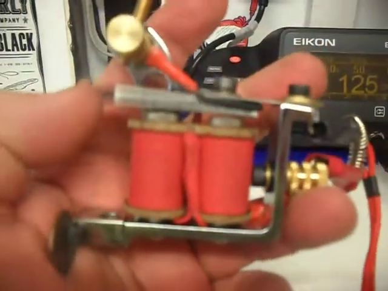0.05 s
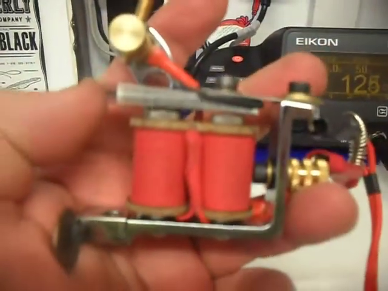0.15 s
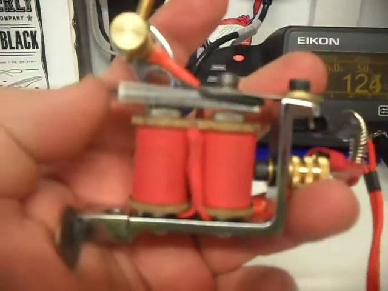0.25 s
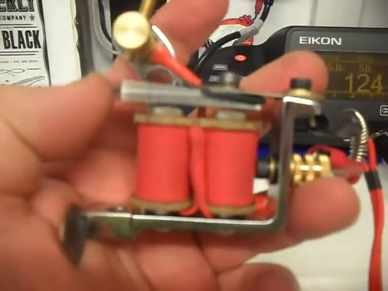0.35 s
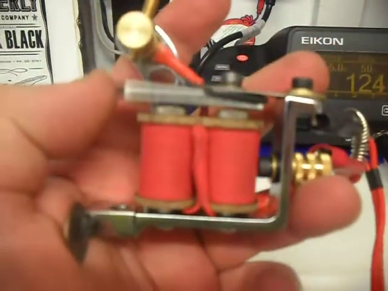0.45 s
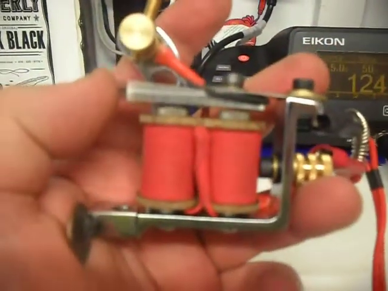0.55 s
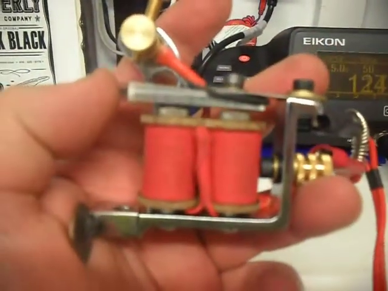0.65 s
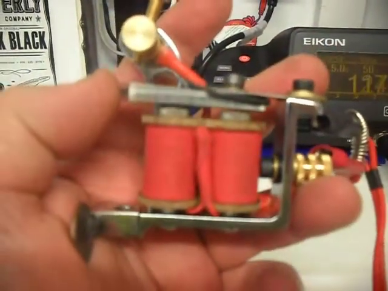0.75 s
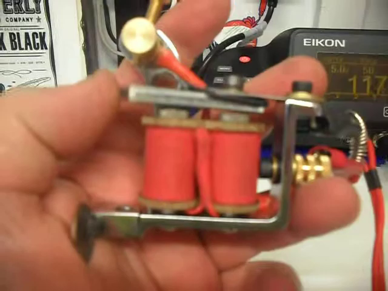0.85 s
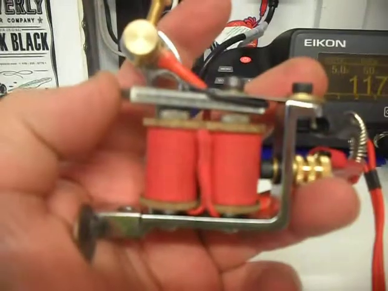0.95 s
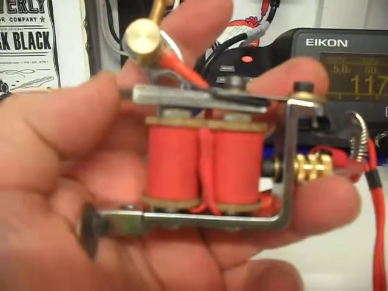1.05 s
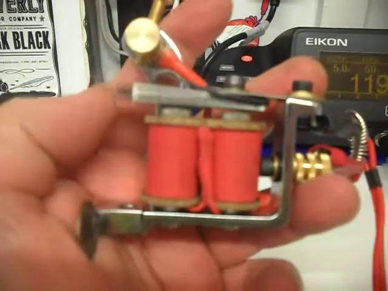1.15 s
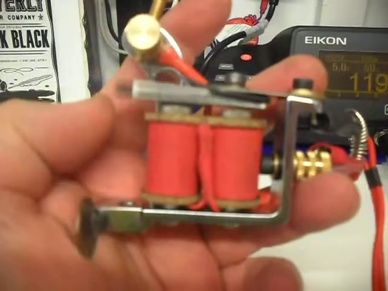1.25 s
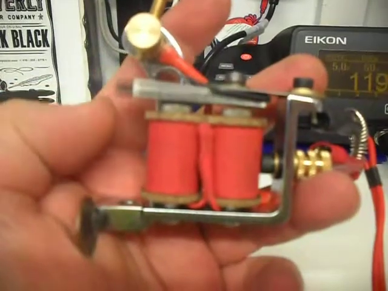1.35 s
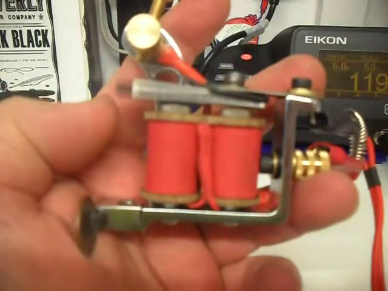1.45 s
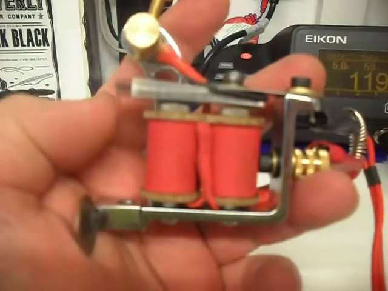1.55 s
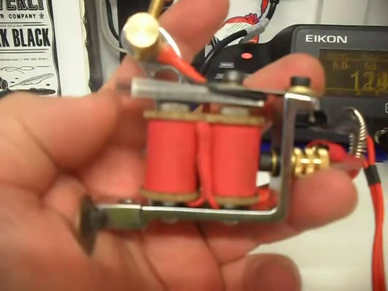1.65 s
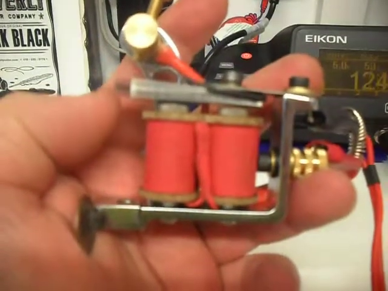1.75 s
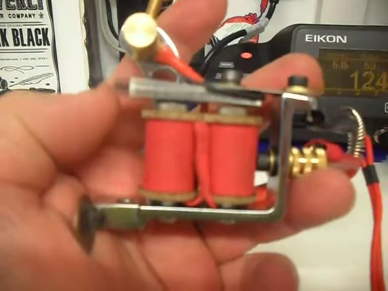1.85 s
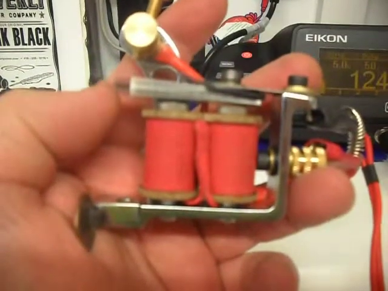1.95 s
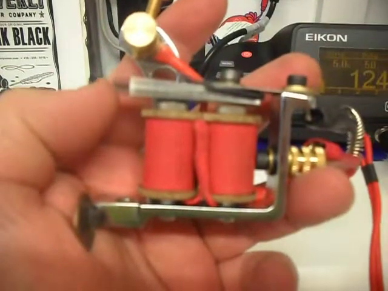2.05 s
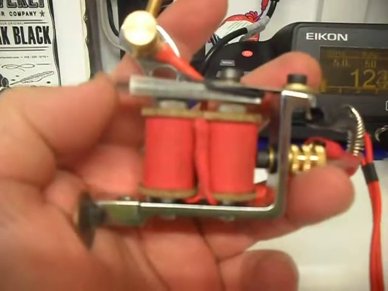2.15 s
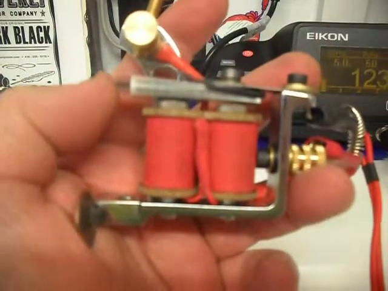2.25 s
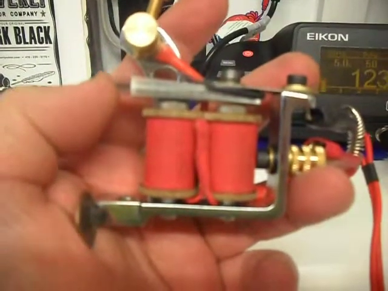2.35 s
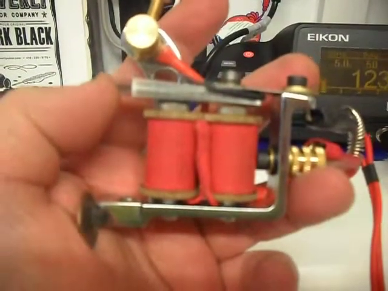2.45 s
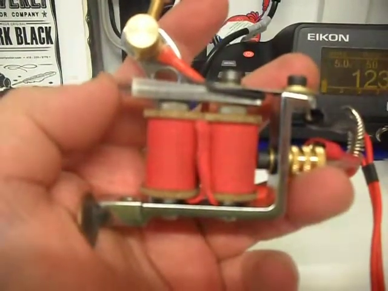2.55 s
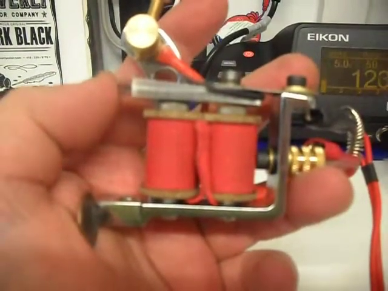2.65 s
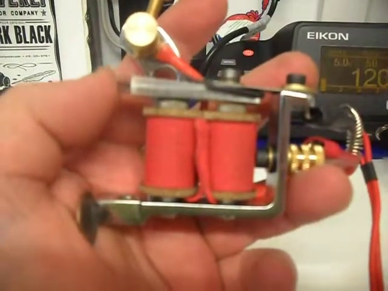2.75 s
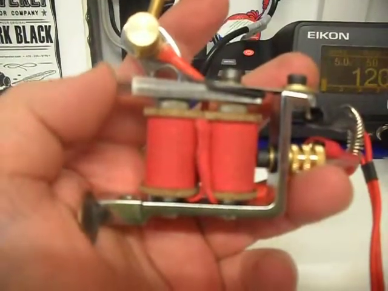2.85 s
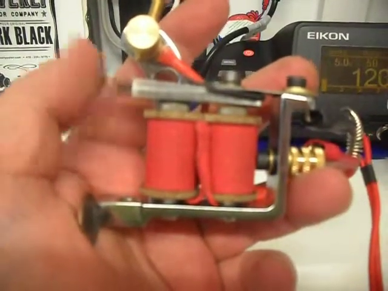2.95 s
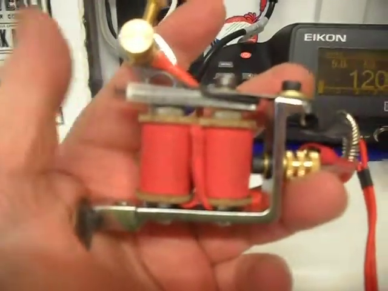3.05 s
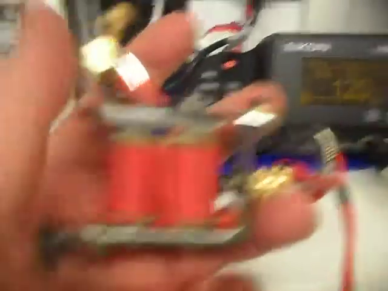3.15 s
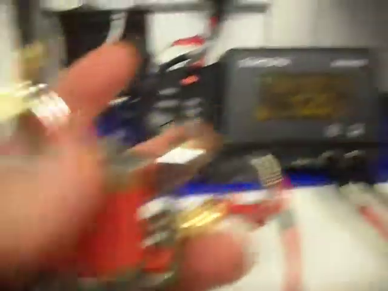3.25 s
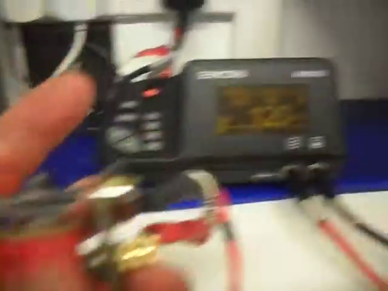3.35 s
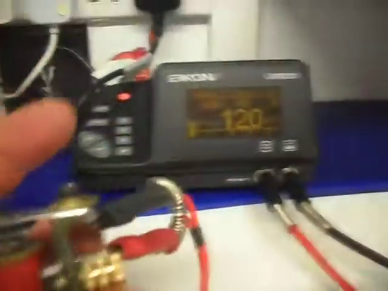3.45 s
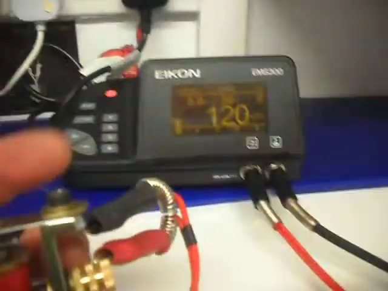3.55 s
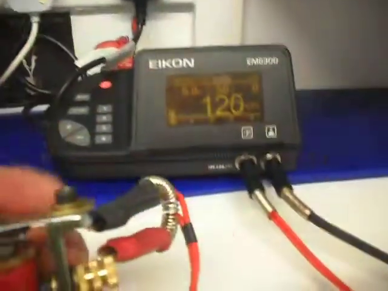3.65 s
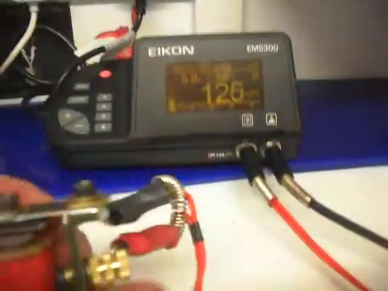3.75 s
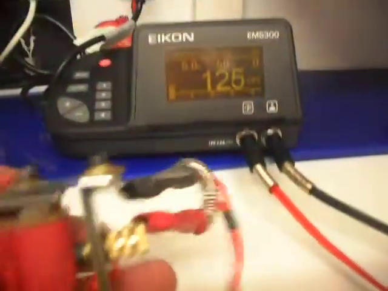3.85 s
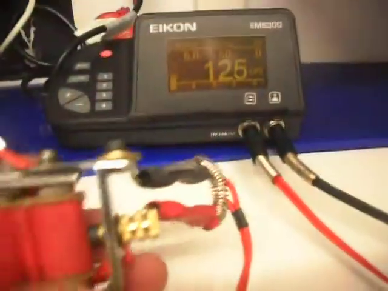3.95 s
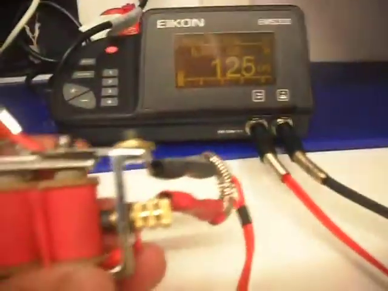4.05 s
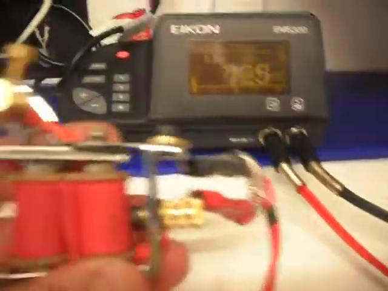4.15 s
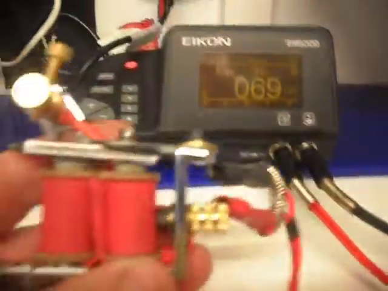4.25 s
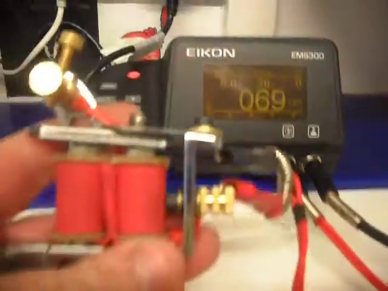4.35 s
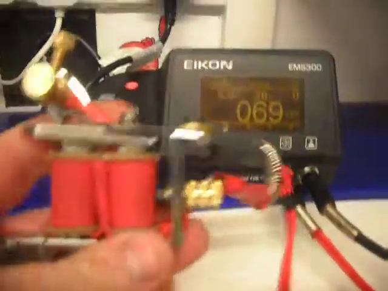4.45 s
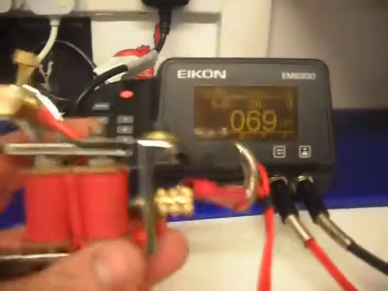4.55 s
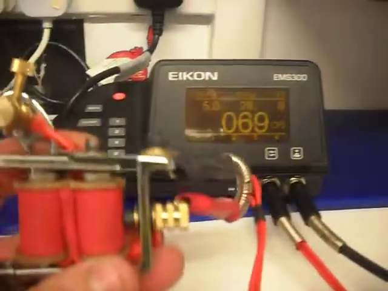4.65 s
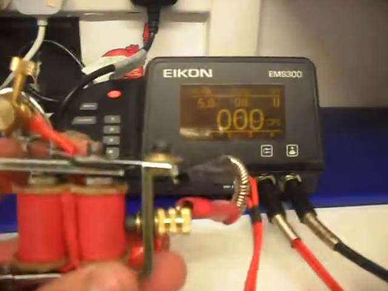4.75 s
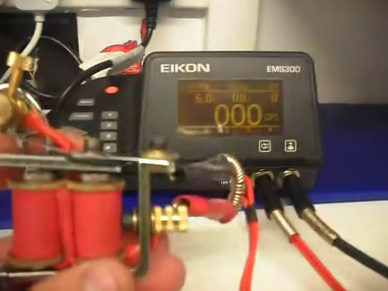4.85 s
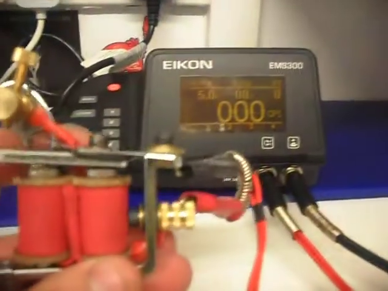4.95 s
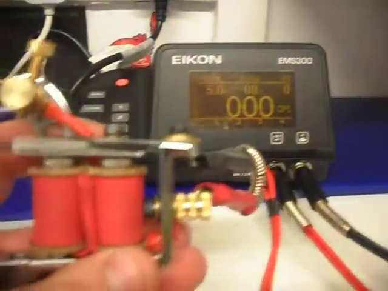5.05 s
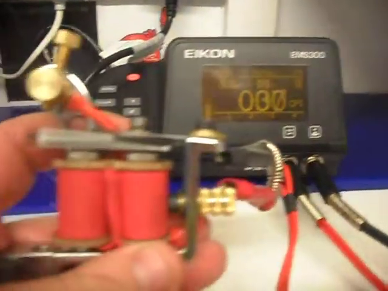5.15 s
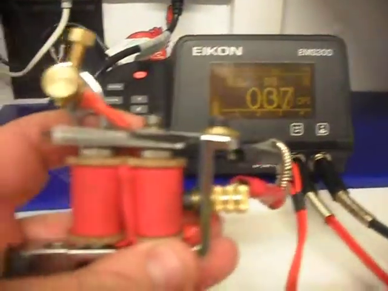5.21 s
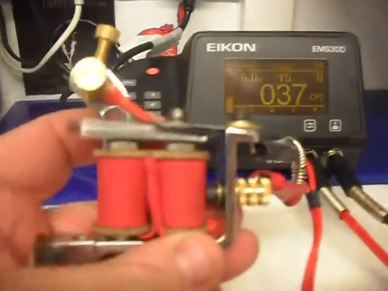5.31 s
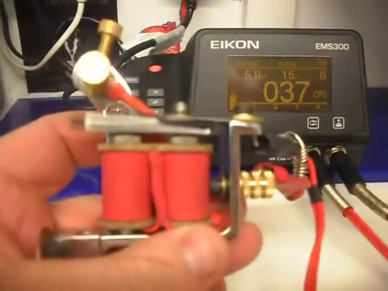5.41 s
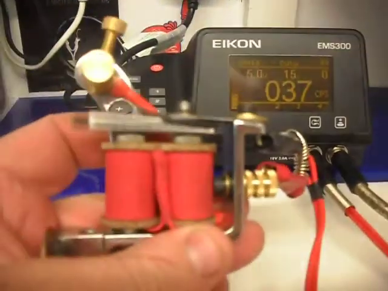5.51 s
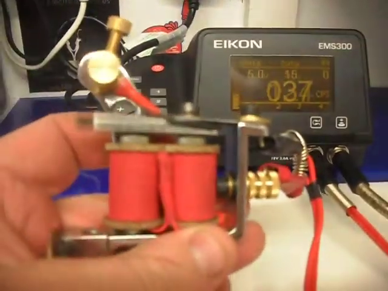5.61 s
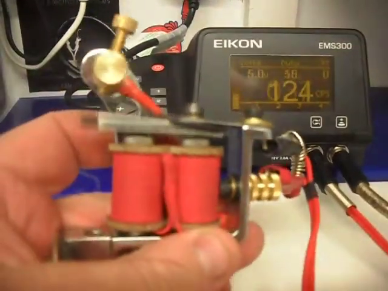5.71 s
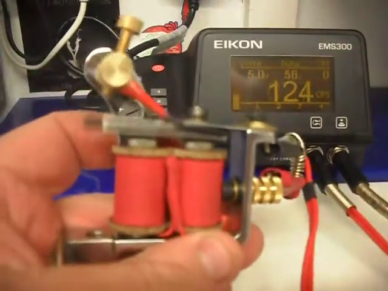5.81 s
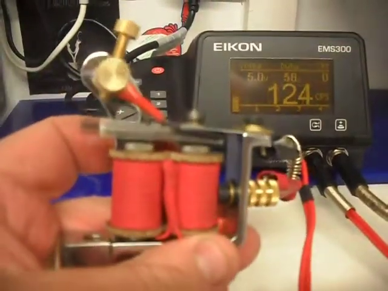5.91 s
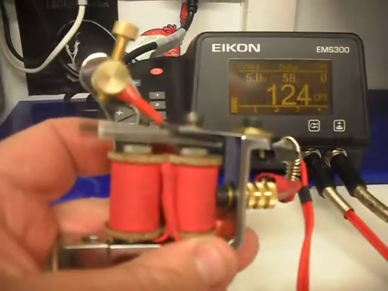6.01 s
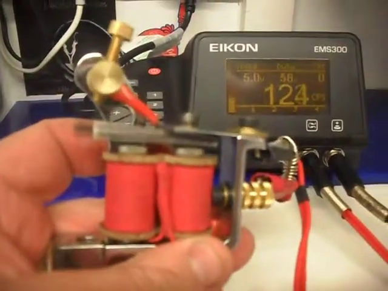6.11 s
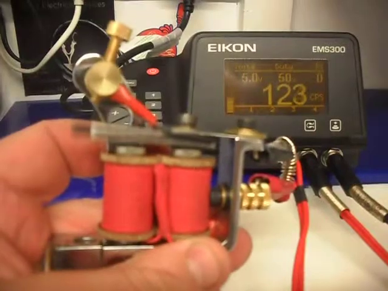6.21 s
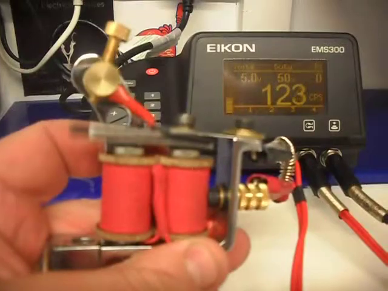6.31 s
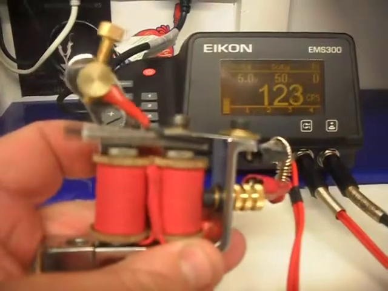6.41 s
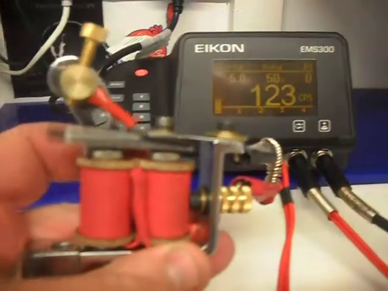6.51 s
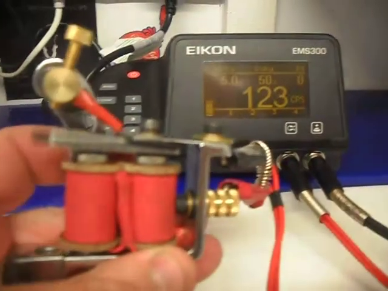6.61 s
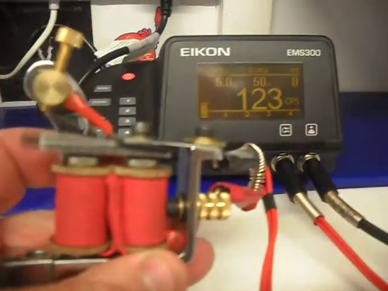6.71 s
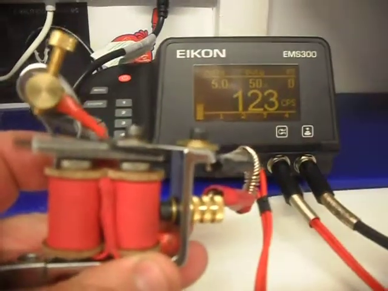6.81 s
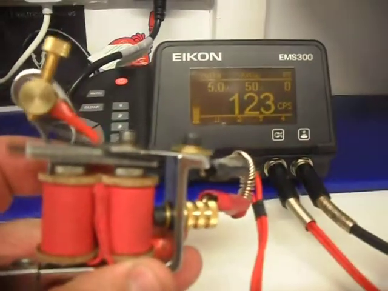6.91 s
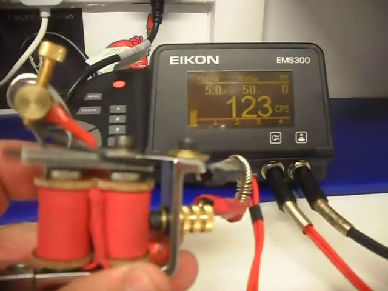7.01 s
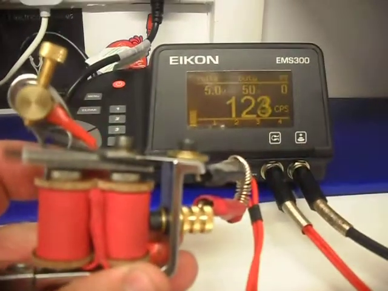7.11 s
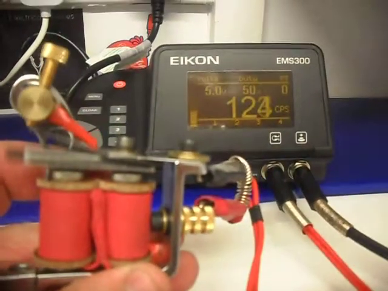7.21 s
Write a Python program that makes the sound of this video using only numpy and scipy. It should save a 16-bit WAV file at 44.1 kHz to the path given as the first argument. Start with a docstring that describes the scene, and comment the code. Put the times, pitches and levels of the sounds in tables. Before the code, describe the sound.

A small coil tattoo machine runs in a hand close to the microphone in a small room with a short tail, faint hiss, low rumble and slight mains hum. It starts mid-buzz, a hard metallic rasp near 120 strokes per second, weakening and sagging slightly in pitch until 0.5 s. Faint, dry ticking with a few grazing swells follows until 1.1 s, when the full bright buzz snaps back. It softens around 2 s, wavers and fades near 2.7 s into a very brief stutter, then recovers by 2.9 s. Dull handling thumps join at 3.2-3.3 s as the treble swirls with movement. Power cuts at about 3.87 s with a quickly dying chatter. Low, soft knocks come near 3.9, 4.2, 4.5, 4.75 and 4.95 s. At 5 s the buzz restarts abruptly, crisp with sizzling ticks, and stays nearly steady around 124 strokes per second, easing slightly until it ends at 7.3 s.

```python
"""A small room, a desk below, and a coil tattoo machine buzzing in a hand close to the microphone.
About 120 times a second the armature strikes the coil core and rings the steel frame, then the spring
ticks back on its screw. Twice the stroke falls short, leaving faint spring ticks and grazing blows.
Later the power is cut for a second while the grip is changed, with dull knocks of hand and cord.
Nearby surfaces swirl the treble, over a short room tail, low rumble, hiss and mains hum."""
import sys
import numpy as np
from scipy import signal
from scipy.fft import rfft, irfft, next_fast_len
from scipy.io import wavfile
from scipy.ndimage import uniform_filter1d

SR = 44100
rng = np.random.default_rng(int(sys.argv[2]) if len(sys.argv) > 2 else 0)


def master(y):
    """Save y as 16-bit WAV."""
    cut = np.clip(np.atleast_2d(y).T, -1, 1)
    pcm = np.round(cut * 32767)  # scale
    wavfile.write(sys.argv[1], SR, pcm.astype(np.int16))


N = 320607
T = np.arange(N) / SR  # seconds
CLICK_SIZE = 2048  # samples in one click
HZ = np.fft.rfftfreq(CLICK_SIZE, 1 / SR)
EDGE_HZ = 12500  # upper limit of the clicks and of the microphone
SOUND_SPEED = 343  # m/s

# Background noise. Each row: frequency in Hz, relative spectrum level in dB.
FLOOR_SPECTRUM = [(15, -9.5), (30, 0.5), (50, -9.5), (105, -21), (170, -22), (330, -23.5), (500, -26.5),
                  (1400, -29.5), (4000, -34.5), (10200, -38), (11200, -57), (12400, -60)]
FLOOR_DB = -61  # overall rms
# Steady mains hum. Each row: frequency in Hz, rms level in dB.
MAINS_HUM = [(100, -76), (150, -82)]

# Bursts of full buzzing, one curve each.
# Each row: time in seconds, strokes per second, blow level in dB before the armature's trim.
BURSTS = [
    [(0.002, 123.38, -37), (0.1, 121.86, -37.5), (0.36, 118.71, -41), (0.47, 116.72, -46.5),
     (0.51, 112.67, -56)],
    [(1.1003, 123.28, -36.5), (1.19, 124.85, -34), (1.58, 124.73, -34.5), (1.84, 122.78, -38.5),
     (2.0, 121.14, -41.8), (2.14, 122.02, -39.7), (2.52, 119.91, -40.5), (2.62, 117.05, -47.5),
     (2.69, 114.6, -56.5)],
    [(2.772, 117.9, -49), (2.81, 119.11, -43.5), (2.88, 120.63, -40), (2.93, 124.46, -37),
     (3.28, 125.08, -38), (3.42, 125.28, -36.5), (3.6, 123.96, -36.5), (3.75, 123.05, -38.5),
     (3.866, 125.79, -40)],
    [(4.9965, 124.32, -39.5), (5.07, 124.4, -38), (5.28, 124.3, -37.5), (5.42, 124.74, -38.5),
     (5.53, 124.08, -36), (5.62, 123.95, -36.5), (6.2, 123.48, -37.5), (7.27, 123.56, -39.5)],
]
# Tone of each burst. Each row: hardness of a blow at FULL_DB in dB per octave,
# tick level in dB relative to the blow, sizzle of a square blow's tick in dB.
BURST_TONES = [(1, -21, 6), (1.0, -16, 19), (0.7, -14, 14), (1.77, -10.5, 23)]
# A blow softer than FULL_DB is duller, by so many dB per octave for each dB.
FULL_DB, HARDNESS_PER_DB = -37, 0.1057
LEAST_TICK_DB = -56.5  # the spring ticks at least this loud during a burst

# How the machine is held: 0 lying on the palm, 1 lowered towards the desk, 2 pinched in the fingertips.
# Each row: time in seconds, hold.
HOLD_CURVE = [(3.1, 0.31), (3.3, 1.13), (3.87, 0.55), (5.0, 1.75), (5.4, 1.61), (5.6, 1.86), (7.25, 1.74)]
# Broad colour of a blow.
# Each row: frequency in Hz, then relative level in dB on the palm, lowered, in the fingertips.
BLOW_COLOUR = [(385, -77.5, -73.5, -96), (511, -64, -56, -53.5), (808, -75, -60.5, -57.5),
               (877, -51.5, -54.5, -45.5), (1360, -55.5, -55, -49), (1810, -54, -60.5, -51),
               (2000, -52.5, -57.5, -50), (2520, -56, -46, -45.5), (4274, -53.5, -53, -64.5),
               (5850, -53.5, -50, -54), (8180, -55.5, -56, -52.5), (9190, -54, -51.5, -58),
               (11880, -72.5, -68, -82), (12200, -86, -83, -102)]
# Frame resonances, negative where the hold cancels one; the frame's freedom scales the heights.
# Each row: frequency in Hz, width in Hz, then height in dB on the palm, lowered, in the fingertips.
FRAME_MODES = [(1480, 60, 3.5, 11.2, 7.3), (2000, 110, -13.6, 4.1, -8.6), (2300, 200, 5.4, 6.0, -10.5),
               (2720, 400, 1.2, -11.4, 4.2), (2840, 110, -6.6, -6.3, -20.0), (2960, 60, 8.8, 15.3, 13.8),
               (2980, 60, 8.7, 3.9, -4.1), (3120, 200, 6.7, 3.2, -3.0), (3340, 200, 5.7, 2.5, 8.3),
               (3760, 200, 17.4, 11.5, 22.1), (3900, 110, 4.4, 3.0, 9.5), (4300, 110, -8.1, -4.5, 16.9),
               (4660, 110, 8.8, 0.1, 11.3), (4760, 200, 17.2, 22.1, 17.7), (5000, 110, 12.5, 0.6, 8.9),
               (5320, 400, -2.9, 5.9, 18.6), (5360, 110, 17.7, 6.9, -15.8), (5880, 200, 5.2, -4.1, -9.9),
               (6560, 200, 3.6, 4.5, 9.0), (7080, 60, 4.0, -0.1, 13.1), (7500, 200, -2.0, 3.2, 9.7),
               (7820, 110, 3.3, 8.1, 8.8), (8180, 60, 7.4, -1.9, 6.4), (8880, 110, 8.5, -3.7, 3.3),
               (9080, 110, 11.4, -6.7, -6.8), (9100, 400, -3.9, 8.1, 6.6), (9620, 400, 0.7, 0.3, 5.4),
               (10260, 110, 9.8, 5.4, 3.9), (10660, 200, 10.0, 1.1, 6.2)]
# Freedom of the frame to ring in the hand. Each row: time in seconds, factor on its modes.
FRAME_FREEDOM = [(0, 0.86), (1.17, 1.06), (1.6, 1.065), (1.95, .75), (2.53, 0.75), (2.82, 0.87),
                 (3.48, 1.05), (3.84, 0.77), (5.43, 0.95), (5.53, 1.14), (7.25, 0.96)]
# Drift of timbre as the fingertips settle.
# Each row: frequency in Hz, width in Hz, height in dB by the end.
FINGER_CREEP = [(2660, 310, 6), (3870, 160, 1), (4330, 130, 4.5), (7450, 160, 3)]
CREEP_FROM_S, CREEP_S = 5.64, 1.4
# Rattling on between armature and core.
# Each row: round trip in seconds, share of each pass that carries on.
RATTLE_LOOPS = [(.00075, 0.72), (.0019, .92)]
# Broad colour of a spring tick. Each row: frequency in Hz, relative level in dB.
TICK_COLOUR = [(200, -15), (400, -10.5), (700, -23.5), (1600, -18.5), (2400, -17), (4200, -14.5),
               (6800, -29.5), (7800, -1), (8700, -17.5), (9700, -0.5), (10800, -9.5), (12200, -28)]
# Spring resonances. Each row: frequency in Hz, width in Hz, height in dB.
SPRING_MODES = [(3034, 254, 16), (3376, 460, 12.5)]

# The frame's shake: base rms level, then what is added when stalled and when the hand has settled.
SHAKE_DB, SHAKE_STALL_DB, SHAKE_SETTLED_DB = -71, 2.5, 7
SETTLE_S, SETTLING_S = 5.5, .25

# The hand's wandering, smoothed over a tenth of a second in use.
# Each row: time in seconds, metres wandered, dB by which nearby surfaces reflect more.
HAND_TRAVEL = [(0, 0, 0), (1.15, .04, -6), (1.58, .041, -6), (2.0, .07, -1), (3.1, .1, -3), (3.22, .14, 7),
               (3.87, .33, 7), (5.0, .4, 0), (5.55, .46, 0), (6.3, .475, -8), (7.27, .5, -2)]
# Reflections off palm, desk and power supply, raised or lowered by the hand's travel.
# Each row: delay in seconds before any wandering, level in dB, change of path per metre wandered.
NEAR_ECHOES = [(.0011, -18, .6), (.0019, -17, .9), (.0034, -18, -1.2), (.0046, -20, 1.6)]
# Decay of the room. Each row: frequency in Hz, time to fall 60 dB in seconds.
ROOM_DECAY = [(200, 0.24), (2000, 0.18), (5000, 0.14), (11000, 0.014)]
ROOM_DB = -18

# In a stall the rate drops, then swells and sags as the armature swings free.
STALL_HZ, FREE_GAIN_HZ, FREE_PEAK_S, FREE_WIDTH_S = 114.3, 8.5, .43, .175
STALL_BLOW_DB, STALL_TICK_DB, STALL_SIZZLE_DB, STALL_HARDNESS = -80.5, -60.5, -7, 0.81
# Wider swings that graze the core; their amplitudes add to the stall's own.
# Each row: time in seconds, half length in seconds, blow level in dB, tick level in dB, extra sizzle in dB.
CORE_GRAZES = [(0.531, 0.029, -68, -53.5, 0), (.577, 0.022, -47, -74, 0), (0.632, 0.039, -72, -53.5, 1),
               (0.796, 0.069, -64, -58.5, 7), (1.06, 0.038, -67, -59, 5), (2.722, 0.092, -69, -54.5, 1)]

# Hand and cord knocking on things. Each row: start in seconds, level in dB before the common trim,
# centre frequency in Hz, time to fall 60 dB in seconds.
KNOCKS = [(3.164, -48, 330.3, 0.17), (3.17, -44.5, 1120, 0.3), (3.198, -40.5, 277, 0.094),
          (3.2, -51, 900, 0.39), (3.239, -48, 1110, 0.37), (3.34, -48, 262, 0.12),
          (3.899, -44.5, 242, 0.092), (4.196, -44, 1020, 0.077), (4.198, -50, 293, .1),
          (4.242, -49, 153, 0.11), (4.494, -44, 213, 0.092), (4.497, -46, 520, 0.074),
          (4.197, -54, 3200, .06), (4.753, -55, 1030, 0.23), (4.762, -57, 3200, .08),
          (4.945, -47, 1340, 0.13), (4.95, -50, 3200, 0.15)]
# Loose chatter as the power goes off or comes on.
# Each row: start in seconds, end in seconds, blow level in dB, tick level in dB, fade by the end in dB.
POWER_CHATTERS = [(3.872, 3.955, -53, -52, 31), (4.97, 4.994, -70, -53, 0)]
CHATTER_HZ, CHATTER_SCATTER_S, CHATTER_SIZZLE_DB = 120.8, .001, -2.5


def amp(db):
    """Decibels to gain."""
    return 10 ** (np.asarray(db) / 20)


def unit(x):
    """Scales to rms 1."""
    return x / np.sqrt(np.mean(x ** 2) + 1e-20)


def follow(table, s):
    """Every column of a curve at the times s."""
    times, *columns = np.transpose(table)
    return np.array([np.interp(s, times, column) for column in columns])


def colour(table, hz):
    """Every column of a spectrum at the frequencies hz, drawn straight over log frequency."""
    points, *columns = np.transpose(table)
    return np.array([np.interp(np.log(hz + 1), np.log(points), column) for column in columns])


def resonances(table):
    """Bell-shaped peaks in dB, one spectrum for each dB column."""
    hz, width, *db = np.transpose(table)
    bells = 1 / (1 + (2 * (HZ - hz[:, None]) / width[:, None]) ** 2)
    return np.array(db) @ bells


def add(mix, start, sound):
    """Mixes a sound in from sample start."""
    part = mix[start:][:len(sound)]
    part += sound[:len(part)]


def background():
    """Low rumble and faint hiss from coloured noise, with mains hum from steady sines."""
    size = next_fast_len(N)
    gain = amp(colour(FLOOR_SPECTRUM, np.fft.rfftfreq(size, 1 / SR))[0])
    noise = irfft(rfft(rng.standard_normal(size)) * gain, size)[:N]
    hum = sum(amp(db) * unit(np.sin(2 * np.pi * hz * T)) for hz, db in MAINS_HUM)
    return amp(FLOOR_DB) * unit(noise) + hum


def ticks(start, end, rate):
    """Times of the strokes from start to end, for a rate given at every sample."""
    turns = np.cumsum(rate) / SR
    first, last = np.interp([start, end], T, turns)
    return np.interp(np.arange(first, last), turns, T)


def looseness(blow_db):
    """1 while the armature misses the core, 0.15 while it hits squarely."""
    return np.interp(blow_db, [-55, -40], [1, .15])


def buzz(curve, hardness, tick_db, sizzle_db):
    """A burst of driven strokes: hardness, tick and sizzle follow the strength of the blow."""
    s = ticks(curve[0][0], curve[-1][0], follow(curve, T)[0])
    rate, blow_db = follow(curve, s)
    hardness = hardness + HARDNESS_PER_DB * (blow_db - FULL_DB)
    sizzle_db = sizzle_db + (STALL_SIZZLE_DB - sizzle_db) * looseness(blow_db)
    tick_db = np.maximum(blow_db + tick_db, LEAST_TICK_DB)
    return s, rate, blow_db, hardness, tick_db, sizzle_db


def rattle():
    """All-pass loops: dying repeats follow each blow without changing its colour."""
    spread = 1
    for trip_s, share in RATTLE_LOOPS:
        back = np.exp(-2j * np.pi * HZ * trip_s)
        spread = spread * (share + back) / (1 + share * back)
    return spread


def hammer(s, rate, level_db, shape_db, band, spread):
    """One causal ringing click at each time s; level_db holds within band, spread smears it in time."""
    # Folding the cepstrum gives each spectrum minimum phase: the ring starts at the blow.
    cepstrum = irfft(np.log(amp(shape_db)), axis=1)
    cepstrum[:, 1:CLICK_SIZE // 2] *= 2
    cepstrum[:, CLICK_SIZE // 2 + 1:] = 0
    spectrum = np.exp(rfft(cepstrum, axis=1))
    # Mean power in the band of a steady train of such clicks.
    power = 2 * (abs(spectrum) ** 2 @ band) / CLICK_SIZE * rate / SR
    start, fraction = np.divmod(s * SR, 1)
    late = np.exp(-2j * np.pi * HZ * fraction[:, None] / SR)  # delay of part of a sample
    gain = (amp(level_db) / np.sqrt(power))[:, None]
    spectrum *= gain * late * spread / (1 + (HZ / EDGE_HZ) ** 20)
    out = np.zeros(N)
    for at, click in zip(start, irfft(spectrum, axis=1)):
        add(out, int(at), click)
    return out


def holding(s):
    """Shares of the three holds (palm, lowered, fingertips) at the times s."""
    hold = np.clip(follow(HOLD_CURVE, s).T, 0, 2)
    return np.maximum(1 - abs(hold - np.arange(3)), 0)


def armature(s, rate, blow_db, hardness, gain_db=-0.55, uneven_db=0.23, jitter_s=.0000012,
             graze_db=-72, seated_db=-54):
    """Steel on steel: each blow rings the frame as freely as the hand allows; a grazing blow only clicks."""
    size, timing = rng.standard_normal((len(s), 2)).T
    level_db = blow_db + gain_db + uneven_db * size
    ring = follow(FRAME_FREEDOM, s)[0] * np.interp(level_db, [graze_db, seated_db], [0, 1])
    hold = holding(s)
    octaves = np.log2(np.maximum(HZ, 700))  # hardness tilts the spectrum above 700 Hz
    shape_db = hold @ colour(BLOW_COLOUR, HZ) + hardness[:, None] * octaves
    shape_db += ring[:, None] * (hold @ resonances(FRAME_MODES))
    crept = np.clip((s - CREEP_FROM_S) / CREEP_S, 0, 1)
    shape_db += crept[:, None] * resonances(FINGER_CREEP)
    band = (HZ > 3900) & (HZ < 7000)
    return hammer(abs(s + jitter_s * timing), rate, level_db, shape_db, band, rattle())


def contact(s, rate, loose, tick_db, sizzle_db, jitter_s=.00002, return_s=.0018, sizzle_hz=6000):
    """The springing return closes the contact with a light tick, less regular when the armature misses."""
    timing = loose * rng.standard_normal(len(s))
    sizzle = sizzle_db[:, None] / (1 + (sizzle_hz / (HZ + 1)) ** 6)
    shape_db = colour(TICK_COLOUR, HZ) + resonances(SPRING_MODES) + sizzle
    return hammer(s + return_s + jitter_s * timing, rate, tick_db, shape_db, HZ > 0, rattle())


def shake(s, rate, loose, second_db=-11, third_db=-20):
    """The swinging mass rocks the whole frame at the lowest multiples of the stroke rate."""
    phase = 2 * np.pi * np.cumsum(np.interp(T, s, rate)) / SR
    tone = sum(amp(db) * np.sin(k * phase) for k, db in enumerate([0, second_db, third_db], 1))
    swinging = np.interp(T, s[1:-1], s[2:] - s[:-2] < .05)  # 0 where no strokes come
    settled = np.clip((T - SETTLE_S) / SETTLING_S, 0, 1)
    level_db = SHAKE_DB + SHAKE_STALL_DB * np.interp(T, s, loose) + SHAKE_SETTLED_DB * settled
    return swinging * amp(level_db) * unit(tone)


def reflections(x, corner_hz=1200):
    """Small surfaces throw back mainly treble; their paths change with the hand, so the buzz swirls."""
    bright = signal.sosfilt(signal.butter(1, corner_hz, "high", fs=SR, output="sos"), x)
    fine = signal.resample_poly(bright, 4, 1)  # finer steps for reading at moving delays
    fine_t = np.linspace(0, N / SR, len(fine), endpoint=False)
    metres, near_db = uniform_filter1d(follow(HAND_TRAVEL, T), SR // 10, axis=1)
    echoes = np.zeros(N)
    for delay_s, db, slope in NEAR_ECHOES:
        heard_from = T - delay_s - slope * metres / SOUND_SPEED
        echoes += amp(db) * np.interp(heard_from, fine_t, fine)
    return amp(near_db) * echoes


def room(x, first_s=0.0042):
    """A short diffuse tail of decaying noise whose treble dies first."""
    hz, t, z = signal.stft(rng.standard_normal(SR // 2), SR, nperseg=256)
    decay = amp(-60 * t / colour(ROOM_DECAY, hz).T)
    tail = signal.istft(z * decay, SR, nperseg=256)[1]
    tail *= np.arange(len(tail)) > first_s * SR
    return signal.fftconvolve(x, tail / np.linalg.norm(tail))[:N]


def stall(start, end):
    """Short strokes: faint ticks that swell wherever the armature grazes the core."""
    rate = STALL_HZ + FREE_GAIN_HZ * np.exp(-((T - start - FREE_PEAK_S) / FREE_WIDTH_S) ** 2)
    s = ticks(start, end, rate)
    at, half_s, blow_db, tick_db, extra_db = np.transpose(CORE_GRAZES)
    swell = np.exp(-((s[:, None] - at) / half_s) ** 2)
    blow = 20 * np.log10(amp(STALL_BLOW_DB) + swell @ amp(blow_db))
    tick = 20 * np.log10(amp(STALL_TICK_DB) + swell @ amp(tick_db))
    sizzle_db = STALL_SIZZLE_DB + swell @ extra_db
    return s, np.interp(s, T, rate), blow, STALL_HARDNESS, tick, sizzle_db


def handling(gain_db=-8, spread=0.48, rise_s=0.0044):
    """Dull, brief knocks and scuffs: band-passed noise that rises fast and decays."""
    out, t = np.zeros(N), np.arange(SR // 2) / SR
    hz = np.fft.rfftfreq(len(t), 1 / SR) + 1
    for s, db, centre, t60 in KNOCKS:
        band = 1 / (1 + ((hz / centre - centre / hz) / spread) ** 2)
        scuff = unit(irfft(rfft(rng.standard_normal(len(t))) * band, len(t)))
        envelope = amp(db + gain_db - 60 * t / t60) * (1 - np.exp(-t / rise_s))
        add(out, round(s * SR), envelope * scuff)
    return out


def chatter(start, end, blow_db, tick_db, fade_db):
    """Undriven strokes come at scattered times, and any fade runs ever faster."""
    s = np.arange(start, end, 1 / CHATTER_HZ)
    fade = fade_db * ((s - start) / (end - start)) ** 2
    scatter = CHATTER_SCATTER_S * rng.standard_normal(len(s))
    return s + scatter, CHATTER_HZ, blow_db - fade, STALL_HARDNESS, tick_db - fade, CHATTER_SIZZLE_DB


def strokes():
    """All strokes in time order, as rows of time, rate, blow dB, hardness, tick dB and sizzle dB."""
    bursts = [buzz(curve, *tone) for curve, tone in zip(BURSTS, BURST_TONES)]
    first, second, third, _ = (burst[0] for burst in bursts)
    stalls = [stall(before[-1] + 1 / STALL_HZ, after[0] - .5 / STALL_HZ)
              for before, after in [(first, second), (second, third)]]
    chatters = [chatter(*row) for row in POWER_CHATTERS]
    every = np.hstack([np.broadcast_arrays(*part) for part in bursts + stalls + chatters])
    return every[:, np.argsort(every[0])]


def scene():
    """Machine and hand in the room."""
    s, rate, blow_db, hardness, tick_db, sizzle_db = strokes()
    loose = looseness(blow_db)
    machine = armature(s, rate, blow_db, hardness) + contact(s, rate, loose, tick_db, sizzle_db)
    near = machine + reflections(machine) + handling()
    return (near + amp(ROOM_DB) * room(near) + shake(s, rate, loose) + background())[None]


def record(dry):
    """The microphone's band limit: a steep low-pass at EDGE_HZ."""
    low_pass = signal.firwin(511, EDGE_HZ, window=("kaiser", 9), fs=SR)
    return signal.oaconvolve(dry, low_pass[None], "same")


dry = scene()
out = record(dry)
master(out)
```